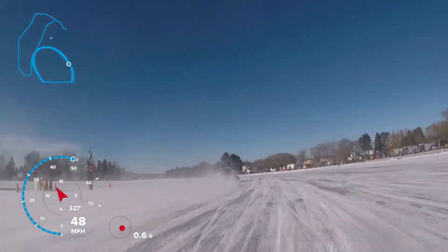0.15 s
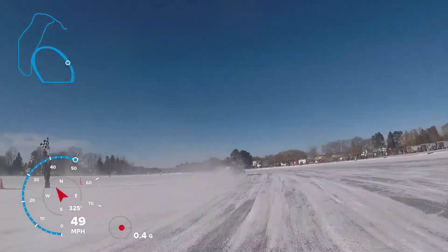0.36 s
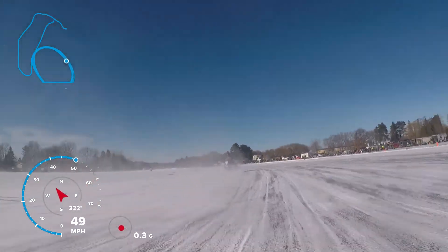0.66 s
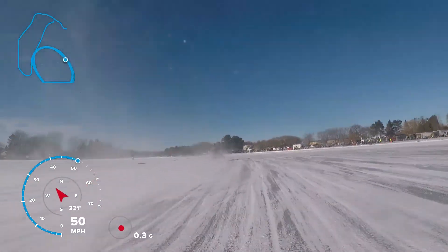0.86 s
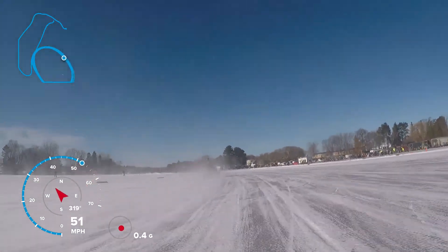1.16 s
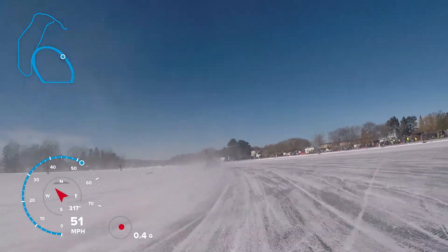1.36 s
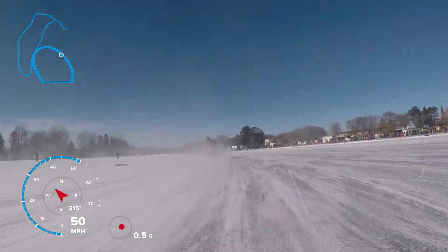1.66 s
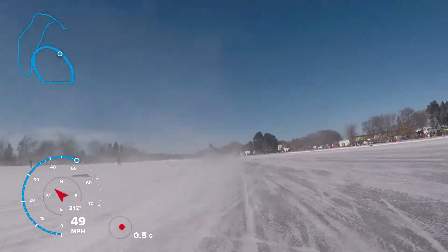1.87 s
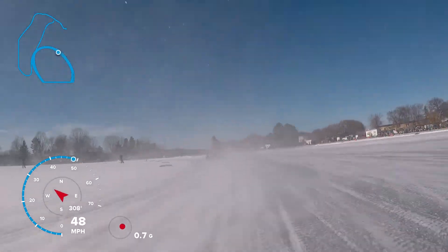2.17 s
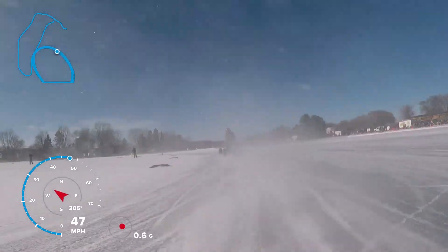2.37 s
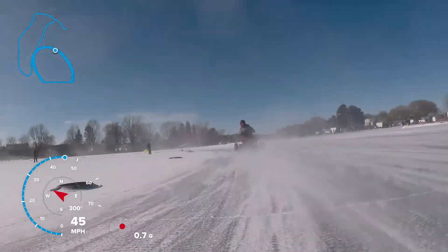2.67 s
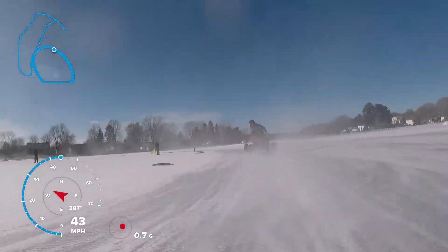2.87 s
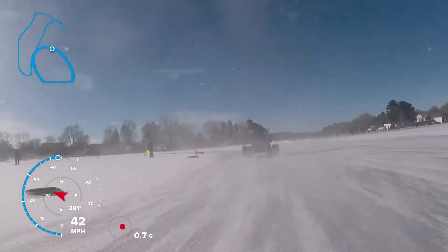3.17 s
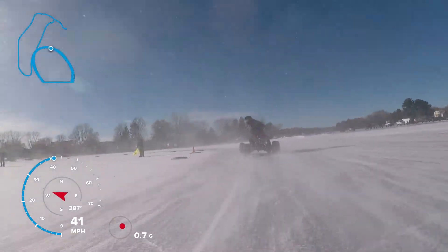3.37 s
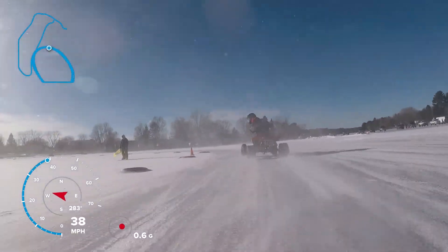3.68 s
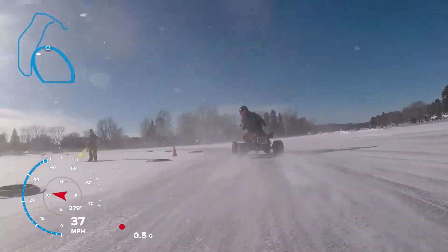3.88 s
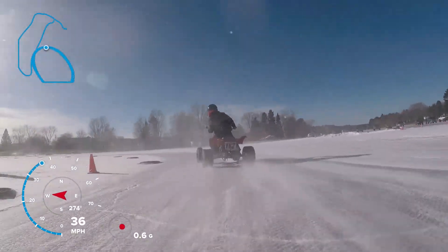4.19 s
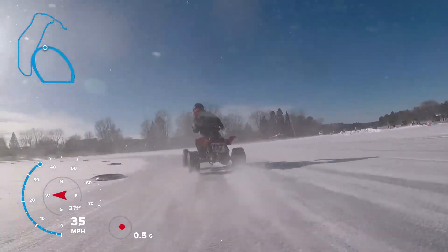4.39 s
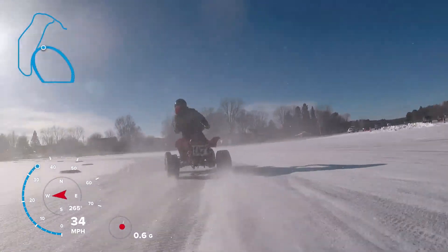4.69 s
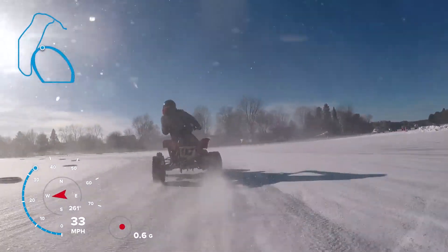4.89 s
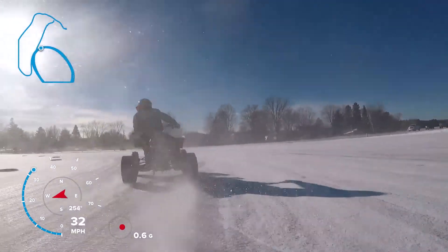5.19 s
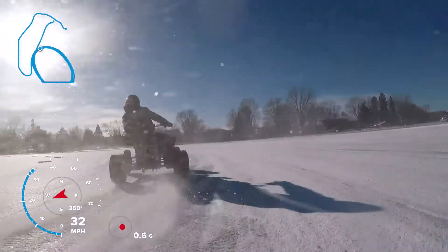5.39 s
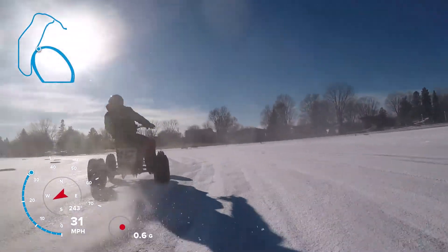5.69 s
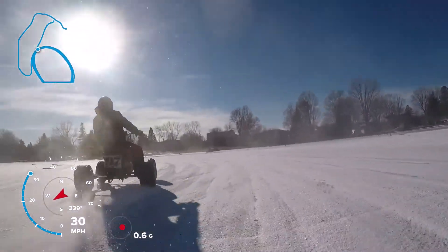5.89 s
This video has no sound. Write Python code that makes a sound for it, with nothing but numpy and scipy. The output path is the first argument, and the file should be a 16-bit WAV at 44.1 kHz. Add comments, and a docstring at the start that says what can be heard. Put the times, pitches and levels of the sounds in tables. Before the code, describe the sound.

The microphone is mounted on a one-cylinder four-stroke racing quad on open ice, close and dry. At 0 s the engine is already high and rasping, with a hard bark and bright fizz. At about 0.25 s a gear change drops the pitch abruptly and the treble dips; it pulls again, climbing to about 0.9 s, then the throttle closes around 1.1 s and the note sinks, with a brief rise near 1.6 s. From 2 s it drones low and unevenly through the turn, the boom swelling and thinning, with small surges around 2.5 and 3.7 s. Another quad ahead joins from about 2.3 s, its exhaust beating against this one, fainter near 5.2 s. Wind rumbles strongest around 2.4 s and subsides towards the end. Clatter, gas roar and hiss continue throughout, while ice ticks crackle in clumps, densest from 2.7 to 5 s. The low boom is strong at the 6 s end.

```python
"""A racing quad with a one-cylinder four-stroke engine, the microphone on board, on an ice oval.
It pulls hard, changes gear, pulls again and eases off: even pulses bark down the pipe over a boom of sines.
From about two seconds on it takes the turn on small throttle openings, droning behind another quad.
Throughout, noise that flares with the engine's strokes gives clatter, hiss and the roar of gas,
filtered noise makes wind close on the microphone, and short filtered clicks are ice ticking on its case."""
import sys
import numpy as np
from scipy import signal
from scipy.fft import rfft, irfft, next_fast_len
from scipy.io import wavfile
from scipy.ndimage import uniform_filter1d, minimum_filter1d

SR = 44100
rng = np.random.default_rng(int(sys.argv[2]) if len(sys.argv) > 2 else 0)


def put_to_file(sound):
    """Save the sound as 16-bit audio at rate SR, in the file named by the first command-line argument."""
    columns = np.atleast_2d(sound).T  # one column per channel
    safe = np.clip(columns, -1, 1)
    whole_steps = np.round(safe * 32767)
    wavfile.write(sys.argv[1], SR, whole_steps.astype(np.int16))


N = 266805
TIME = np.arange(N) / SR


def from_db(db):
    """Amplitude factor of a level in dB."""
    return 10 ** (np.asarray(db) / 20)


def rms_one(x):
    """Scales the whole signal to rms 1."""
    return x / np.sqrt(np.mean(x ** 2) + 1e-20)


def levelled(x):
    """Holds the level at rms 1 over every eighth of a second."""
    power = np.abs(uniform_filter1d(x ** 2, size=SR // 8))
    return x / np.sqrt(power + 1e-12)


def in_time(rows):
    """Each column of a curve, sample by sample."""
    s, *columns = np.transpose(rows)
    return [np.interp(TIME, s, column) for column in columns]


def at_hz(spectrum, hz):
    """Level in dB of a spectrum at the given frequencies."""
    points, db = np.transpose(spectrum)
    return np.interp(np.log(hz), np.log(points), db)


def drift(rate_hz):
    """Smooth chance with spread 1: noise through two equal low-pass poles at rate_hz."""
    step = 40                           # samples between the drawn values
    pole = np.exp(-2 * np.pi * rate_hz * step / SR)
    noise = rng.standard_normal(N // step + 2002)
    slow = signal.lfilter([1], [1, -2 * pole, pole * pole], noise)[2000:]   # settled part only
    return np.interp(np.arange(N) / step, np.arange(len(slow)), rms_one(slow))


def coloured(x, spectrum):
    """Causal (minimum-phase) filter with the given spectrum, made by folding its cepstrum."""
    size = 2 * next_fast_len(N // 2 + SR // 4)
    hz, db = np.transpose(spectrum)
    log_hz = np.log(np.arange(size // 2 + 1) * SR / size + 1)
    cepstrum = irfft(np.log(from_db(np.interp(log_hz, np.log(hz), db))))
    cepstrum[1:size // 2] *= 2
    cepstrum[size // 2 + 1:] = 0
    return irfft(rfft(x, size) * np.exp(rfft(cepstrum)), size)[:N]


def cycles(per_s, wobble):
    """Engine cycles turned so far; the speed wavers a little."""
    return np.cumsum(per_s * (1 + wobble * drift(15))) / SR


def stroke(turn, length):
    """A burst at the start of each turn that dies within a share of it."""
    return np.exp(-(turn % 1) / length)


def exhaust(per_s, turn, opening, boom_db):
    """An open throttle fires evenly and barks, rasping at high revs; a shut one drones unevenly at low speed."""
    # The silencer's pipe on an open throttle. Each row: frequency in Hz, gain in dB.
    open_pipe = [(45, -28), (75, 15), (140, -33), (280, -11), (360, 5), (440, 0), (550, 5.5), (630, -9),
                 (710, 0), (810, 2), (950, -5.5), (1250, -10), (1500, -22), (1800, -18.5), (2300, -33.5),
                 (3500, -55.5), (9000, -61)]
    # The header pipe's rasp at high revs. Each row: frequency in Hz, gain in dB.
    header = [(600, -19.5), (950, -6), (1150, 1), (1400, 1.5), (1600, -1.5), (1850, -3), (2050, -14.5),
              (2600, -13.5), (3400, -27.5), (6000, -62)]
    # The pipe on a shut throttle. Each row: frequency in Hz, gain in dB.
    shut_pipe = [(50, 0), (110, -10.5), (210, 4), (260, -6.5), (330, 0), (420, 3), (520, -1.5), (640, -13),
                 (780, -21.5), (1000, -34), (1750, -26), (2300, -26)]
    uneven = 1 - 0.75 * opening
    orders = [1, *range(5, 25)]         # the boom holds the orders between
    # rasp and drone lose level for each firing per s away from the top and the lowest speed
    rasp_db = -35.5 - 1.0 * (per_s.max() - per_s)
    drone_db = -28.5 - 0.5 * (per_s - per_s.min())
    low = from_db(1.05) * boom(per_s, turn, opening, boom_db, uneven, flutter=0.26, sway=0.22)
    barking = from_db(-25) * opening * bark(turn, uneven, open_pipe, scatter=0.43, bounce=.5)
    rasp = from_db(rasp_db) * opening * bark(turn, uneven, header, scatter=1.0, bounce=0.24)
    droning = drone(per_s, turn, shut_pipe, orders, uneven, crank_db=7, flutter=.6, sway=.009)
    return low + barking + rasp + from_db(drone_db) * droning


def boom(per_s, turn, opening, fourth_db, uneven, flutter, sway):
    """The silencer passes three low orders as near sines that flutter; the lower two grow with the throttle."""
    # What the silencer passes of the 2nd and 3rd orders. Each row: frequency in Hz, relative level in dB.
    silencer = [(102, -11.5), (107, 0), (125, -8.5), (142, -5.5), (152, 2.5), (178, -1), (212, 3.5),
                (228, -3.5), (270, -2.5)]
    second_db = at_hz(silencer, 2 * per_s) - 23.5 + 7.8 * opening
    third_db = at_hz(silencer, 3 * per_s) - 30.5 + 7.7 * opening
    out = 0
    for order, level_db in enumerate((second_db, third_db, fourth_db), start=2):
        phase = 2 * np.pi * (order * turn + rng.random()) + sway * uneven * drift(25)
        strength = 1 + flutter * uneven * drift(25)
        out = out + from_db(level_db) * strength * np.sin(phase)
    return out


def bark(turn, uneven, pipe, scatter, bounce):
    """Each firing sends one pressure pulse down the pipe, and the silencer's echoes spread it out."""
    # The silencer's chambers. Each entry: round trip in seconds.
    chambers = [0.001294, .0029, .0047]
    fired = np.diff(np.floor(turn), prepend=0) > 0
    pulses = fired * np.maximum(1 + scatter * uneven * rng.standard_normal(N), 0)
    for trip_s in chambers:             # all-pass echoes leave the level of each order alone
        loop = np.r_[1, np.zeros(int(trip_s * SR)), bounce]
        pulses = signal.lfilter(loop[::-1], loop, pulses + 1e-18)
    return levelled(coloured(pulses, pipe))


def drone(per_s, turn, pipe, orders, uneven, crank_db, flutter, sway):
    """Orders of the firing rate slide through the pipe's resonances; even ones gain from the crank's turning."""
    out = 0
    late = sway * uneven * drift(15)    # firings come early or late, in cycles
    for order in orders:
        gain = from_db(at_hz(pipe, order * per_s) + crank_db * (order % 2 == 0))
        strength = 1 + flutter * uneven * drift(16.3)
        phase = 2 * np.pi * (order * (turn + late) + rng.random())
        out = out + gain * strength * np.sin(phase)
    return levelled(out)


def machinery(turn, spectrum, firing, piston, grit_db):
    """Noise that flares at each firing and at the four piston reversals of a cycle."""
    flare = 1 + firing * stroke(turn, length=.25) + piston * stroke(4 * turn, length=.35)
    grit = from_db(grit_db * drift(200))
    return levelled(coloured(rng.standard_normal(N) * flare * grit, spectrum))


def roar(turn, opening, bang, wind_db, spray_db):
    """Gas rushing in pipe and air box, louder with the throttle, the airflow and the spray."""
    # Colour of the rushing gas. Each row: frequency in Hz, gain in dB.
    gas = [(80, -20), (170, 6.5), (300, 0.5), (430, -2), (560, -4.5), (660, -7.5), (800, -13), (1100, -17),
           (2000, -33), (4000, -55)]
    airflow_swing_db = wind_db - wind_db.mean()
    roar_db = -26 + 2.5 * opening ** 2 + 0.31 * airflow_swing_db + 0.56 * spray_db
    return from_db(roar_db) * machinery(turn, gas, firing=1.2 * bang, piston=0.24, grit_db=0.5)


def treble(per_s, turn, opening, bang, spray_db, rattle_db):
    """Clatter rises with power and the running gear's rattle, hiss with power and spray, fizz with spray
    and on cam; all of it, with the ice, dips at the gear change and in one brief lull."""
    # Clatter of engine and running gear. Each row: frequency in Hz, gain in dB.
    clatter_colour = [(250, -22.5), (600, 2), (1020, 1.5), (1300, -1.5), (1620, -0.5), (1830, 3),
                      (2050, -2), (2450, -1), (2900, -8), (3400, -17), (5000, -53)]
    # Metallic hiss. Each row: frequency in Hz, gain in dB.
    hiss_colour = [(2500, -47.5), (3500, -12.5), (4200, -8.5), (4700, 0), (5400, -0.5), (6000, 1.5),
                   (6800, -2.5), (7700, -13.5), (9000, -18.5), (10500, -26.5), (12000, -58), (14500, -50),
                   (16000, -67)]
    # Fine fizz at the very top. Each row: frequency in Hz, gain in dB.
    fizz_colour = [(3500, -33), (6500, 8), (8000, 3), (9500, 0), (10700, -9.5), (12000, -26), (14500, -28),
                   (16000, -39.5)]
    cam_per_s, cam_width_per_s = 72, .5  # above this firing rate the engine comes on cam and its intake fizzes
    power = opening * (per_s / per_s.max()) ** 3.9
    on_cam = opening / (1 + np.exp((cam_per_s - per_s) / cam_width_per_s))
    flicker = drift(7.4)                 # clatter, hiss and fizz swell and thin together
    clatter_db = rattle_db - 0.8 + 1.0 * power + .4 * flicker
    hiss_db = -37.3 + 6.4 * power + 0.89 * spray_db + 0.66 * flicker
    fizz_gain = from_db(-63.5 + 0.65 * spray_db) + from_db(-45.5) * on_cam
    fizz_gain = fizz_gain * from_db(2.2 * flicker)
    clatter = from_db(clatter_db) * machinery(turn, clatter_colour, 1.4 * bang, piston=0.34, grit_db=1.2)
    hiss = from_db(hiss_db) * machinery(turn, hiss_colour, 1.23 * bang, piston=1.0, grit_db=1.83)
    fizz = fizz_gain * machinery(turn, fizz_colour, 1.9 * bang, piston=.6, grit_db=2.0)
    grains = ice(spray_db, spread_db=3.6, chip_db=4.0, clump_db=3.5)
    shift = dip(at_s=.26, recover_s=.11, depth_db=-3.5)
    lull = dip(at_s=4.392, recover_s=.024, depth_db=-10)
    return (clatter + hiss + fizz + grains) * shift * lull


def dip(at_s, recover_s, depth_db):
    """A gain that drops away at once and comes back."""
    since = (TIME - at_s) / recover_s
    return from_db(depth_db * (since > 0) * np.exp(-since ** 2))


def ice(spray_db, spread_db, chip_db, clump_db):
    """Grains thrown up by studded tyres tick on the case in clumps: many small ones, a few big."""
    # Big grains hitting the case. Each row: time in seconds, peak in dB before chip_db is added.
    chips = [(2.6856, -26), (3.4328, -25), (3.8284, -22), (4.119, -25), (4.5759, -24), (4.6512, -20.5),
             (5.1792, -31), (5.3118, -31)]
    # Colour of one tick on the case. Each row: frequency in Hz, gain in dB.
    grain_colour = [(1000, -22), (3400, -20), (4700, -5), (6400, 0), (7800, -7), (9800, -6), (11000, -11),
                    (12000, -23), (13800, -24), (16000, -48)]
    grains_per_s, grain_db = 230, -35.5  # rate and smallest peak at a spray of 0 dB, before clumping
    # rate and size each follow a share of the spray's swing in dB
    rate = grains_per_s * from_db(1.1 * spray_db + clump_db * drift(12))
    born = rng.random(N) < rate / SR
    extra_db = spread_db * np.minimum(rng.exponential(1, N), 3)
    hits = born * from_db(grain_db + 0.75 * spray_db + extra_db)
    for s, peak_db in chips:
        hits[round(s * SR)] += from_db(peak_db + chip_db)
    tick_peak = np.abs(coloured(1.0 * (TIME == 0), grain_colour)).max()
    return coloured(hits * rng.choice([-1, 1], N), grain_colour) / tick_peak


def rival():
    """The quad ahead runs at nearly the same speed, so the two exhausts beat."""
    # The quad ahead. Each row: time in seconds, firings per s, level in dB.
    quad_ahead = [(2.1, 57, -56), (2.45, 52.7, -31), (2.85, 55, -27.5), (3.1, 53, -32), (3.75, 58.5, -32.5),
                  (4.2, 53.5, -33), (4.65, 56.5, -36), (5.2, 55.4, -48), (6.05, 53, -37.5)]
    # Its exhaust pipe. Each row: frequency in Hz, gain in dB.
    rival_pipe = [(60, -31), (170, 1.5), (300, 2), (430, 11.5), (560, 0), (660, -3.5), (790, 1.5),
                  (1000, -43), (2300, -42)]
    per_s, level_db = in_time(quad_ahead)
    turn = cycles(per_s, wobble=0.00499)
    droning = drone(per_s, turn, rival_pipe, range(2, 20), uneven=.6, crank_db=4.0, flutter=.5, sway=.004)
    return from_db(level_db) * droning


def wind(lumpy_db):
    """Eddies buffet the microphone: low noise that swells and sinks at random."""
    # Colour of the buffeting. Each row: frequency in Hz, gain in dB.
    wind_colour = [(15, -9), (35, -14.5), (65, -1.5), (110, -4), (180, -8), (300, -8), (500, -21),
                   (900, -34.5), (2000, -34), (5000, -82)]
    lumps = from_db(lumpy_db * drift(25))
    return levelled(coloured(rng.standard_normal(N) * lumps, wind_colour))


def scene():
    """Both engines, the machinery, the wind and the spray, all close and dry."""
    # Engine speed through the pulls and the turn. Each row: time in seconds, firings per s.
    speed = [(0, 87.75), (.23, 89), (.32, 68.3), (.5, 70.8), (.66, 71.5), (.86, 77.4), (1.07, 71.8),
             (1.15, 63.8), (1.25, 61.2), (1.44, 61.9), (1.63, 68), (1.7, 64.3), (1.82, 63.4), (2.02, 57.2),
             (2.48, 56), (2.73, 52.8), (2.9, 56.3), (3.15, 49.5), (3.35, 48.3), (3.4, 54.3), (3.48, 54),
             (3.58, 57.7), (3.78, 58.5), (3.86, 52.6), (4.2, 54.4), (4.75, 50.8), (4.92, 54), (5.0, 52.4),
             (5.28, 52.2), (5.55, 49.9), (5.78, 51.4), (6.05, 50)]
    # Two pulls with a gear change between, then small openings. Each row: time in seconds, throttle 0-1.
    throttle = [(0, 0.7), (.23, 0.88), (.27, 0.36), (.42, .9), (.65, 1), (1.07, 0.66), (1.13, .1),
                (2.15, .1), (2.45, 0.32), (2.85, 0.28), (3.3, 0.08), (3.74, 0.48), (3.9, .2), (6.05, .28)]
    # The exhaust's main note, the 4th order. Each row: time in seconds, level in dB before a 1.05 dB lift.
    main_note = [(0, -21), (.35, -27.5), (.58, -20.5), (.7, -15), (1.03, -16), (1.3, -26), (1.55, -19.5),
                 (1.63, -23.5), (1.72, -18), (1.92, -19.5), (2.05, -24), (2.5, -27.5), (2.68, -14.5),
                 (2.87, -28), (3.05, -21.5), (3.29, -12), (3.37, -22.5), (3.45, -18.5), (3.66, -31.5),
                 (3.87, -13), (4.2, -20.5), (4.4, -17.5), (4.6, -17), (4.9, -12.5), (5.45, -14), (5.8, -12),
                 (6.05, -10.5)]
    # Air over the microphone. Each row: time in seconds, level in dB before a 3.5 dB lift.
    airflow = [(0, -32), (.5, -28.5), (1.8, -26), (2.4, -23.5), (3.2, -26.5), (3.75, -27.5), (3.95, -31),
               (4.6, -29), (6.05, -38)]
    # Ice spray from the quad ahead, and the bumpy track. Each row: time in seconds,
    # thickness of the spray in dB, rattle of the running gear in dB before the treble's trims.
    spray = [(.4, -6, -43), (.95, -3.5, -40.5), (1.3, -8, -44), (2.1, -7, -42.5), (2.8, -2, -39.5),
             (3.15, -3.5, -39), (3.7, -1.5, -38.5), (4.65, -0.5, -38), (5.4, -4, -40.5), (6.05, -4, -40)]
    per_s, = in_time(speed)
    boom_db, = in_time(main_note)
    opening, = in_time(throttle)
    wind_db, = in_time(airflow)
    spray_db, rattle_db = in_time(spray)
    turn = cycles(per_s, wobble=.001)
    bang = 0.28 + 0.87 * opening ** 2      # how sharply each firing stands out of the noise
    own_exhaust = exhaust(per_s, turn, opening, boom_db)
    gas_rush = roar(turn, opening, bang, wind_db, spray_db)
    bright = treble(per_s, turn, opening, bang, spray_db, rattle_db)
    air = from_db(wind_db + 3.5) * wind(lumpy_db=2.0)
    return (own_exhaust + gas_rush + bright + rival() + air)[None]


def record(dry, ceiling=0.35):
    """A fast look-ahead limiter holds the peaks down; a steep low-pass cuts the top."""
    room = np.minimum(1, ceiling / (np.abs(dry) + 1e-9))
    gain = uniform_filter1d(minimum_filter1d(room, size=300), size=300)
    low_pass = signal.cheby2(12, 60, 15200, fs=SR, output="sos")   # 60 dB down from 15200 Hz
    return signal.sosfilt(low_pass, dry * gain)


dry = scene()
out = record(dry)
put_to_file(out)
```